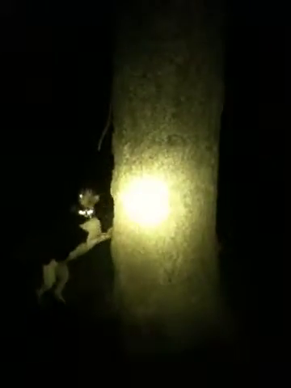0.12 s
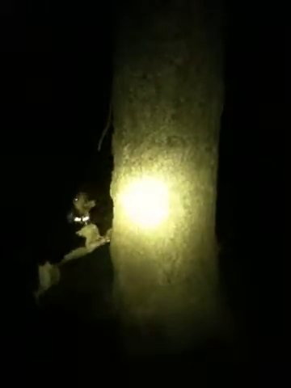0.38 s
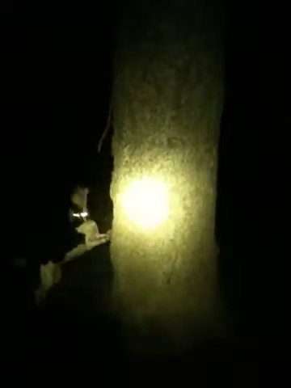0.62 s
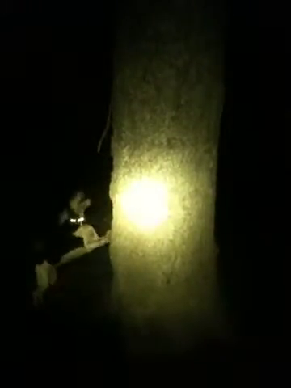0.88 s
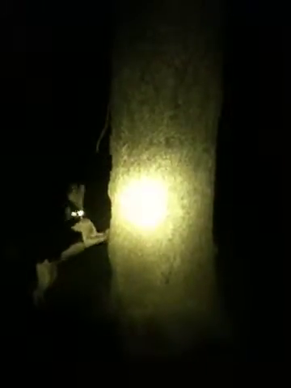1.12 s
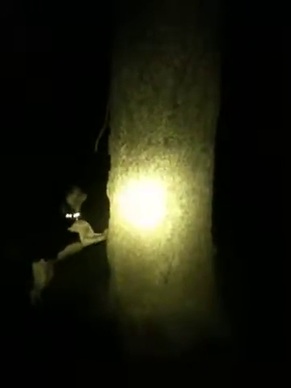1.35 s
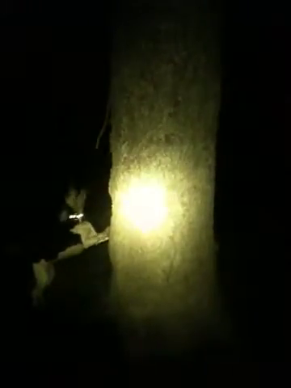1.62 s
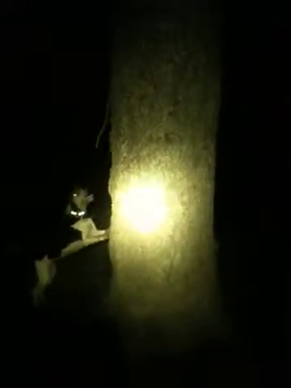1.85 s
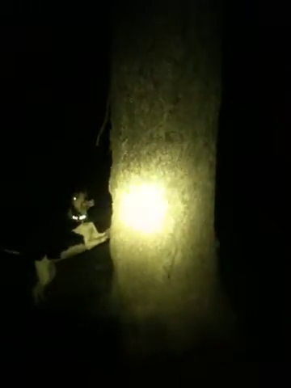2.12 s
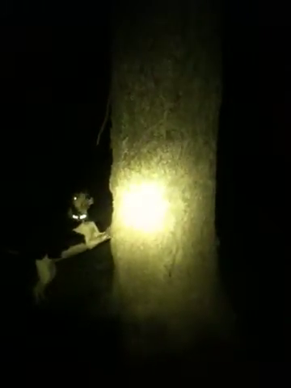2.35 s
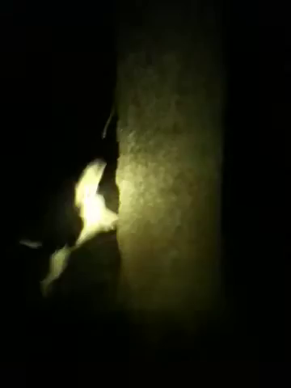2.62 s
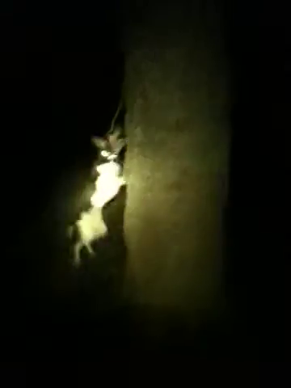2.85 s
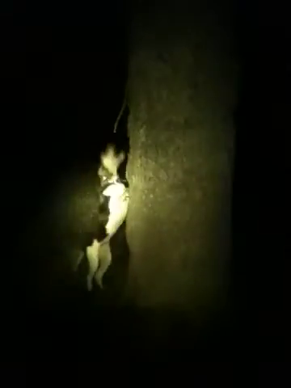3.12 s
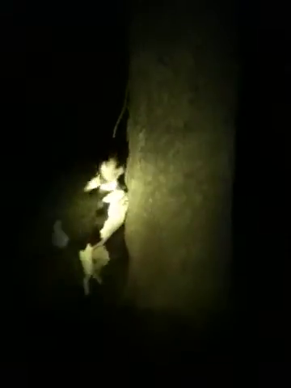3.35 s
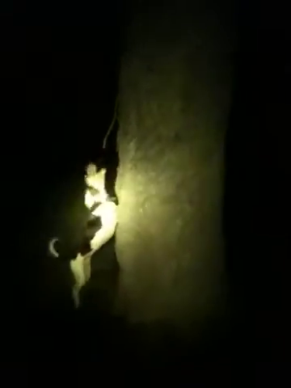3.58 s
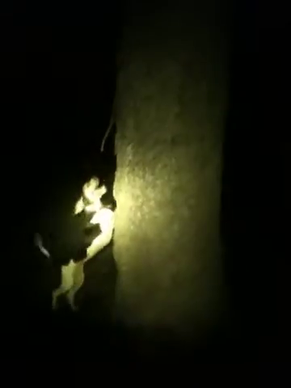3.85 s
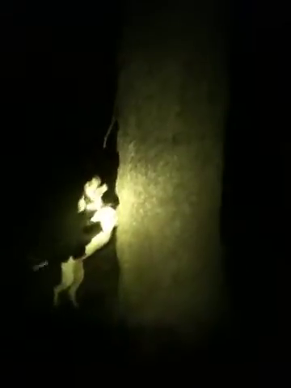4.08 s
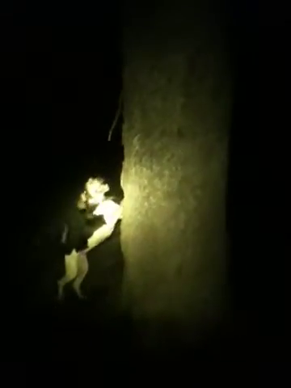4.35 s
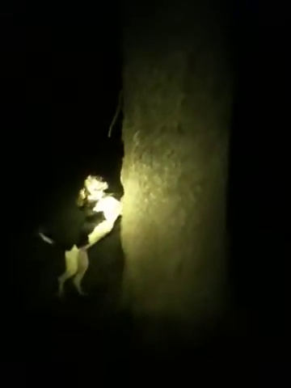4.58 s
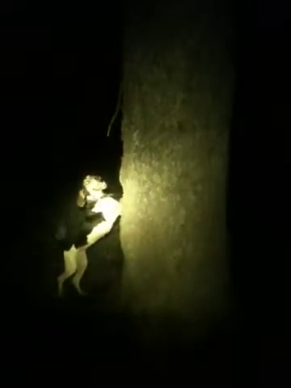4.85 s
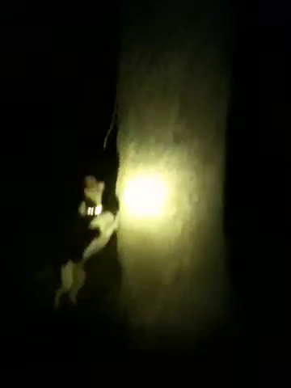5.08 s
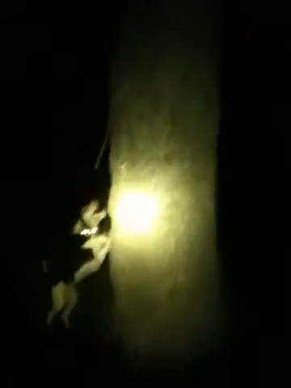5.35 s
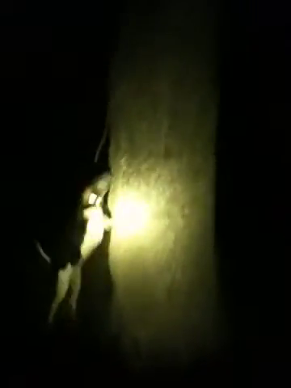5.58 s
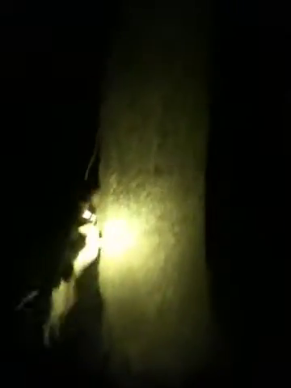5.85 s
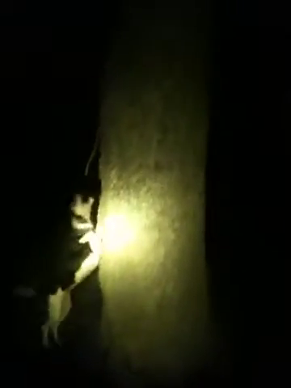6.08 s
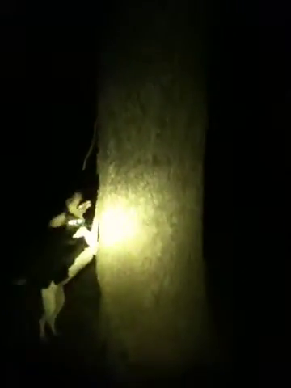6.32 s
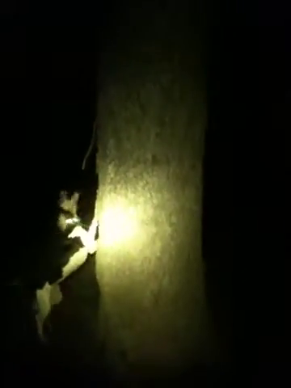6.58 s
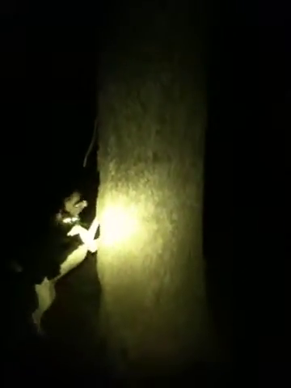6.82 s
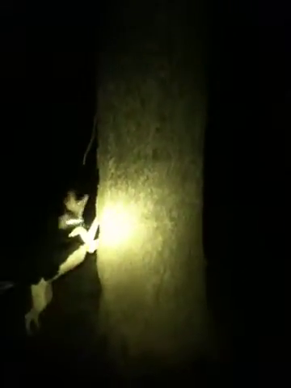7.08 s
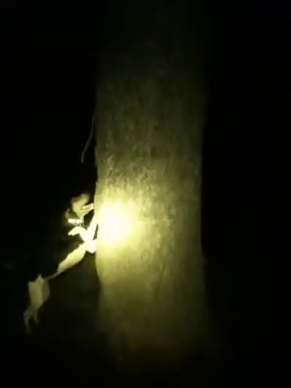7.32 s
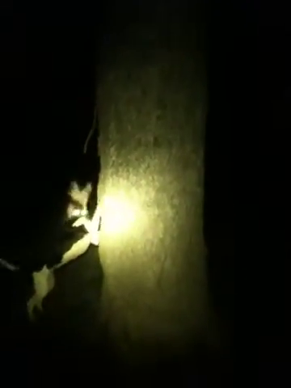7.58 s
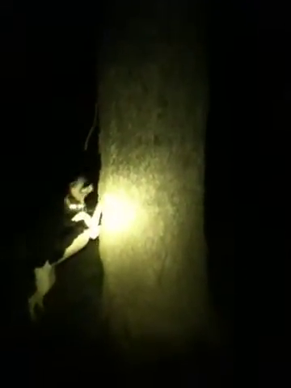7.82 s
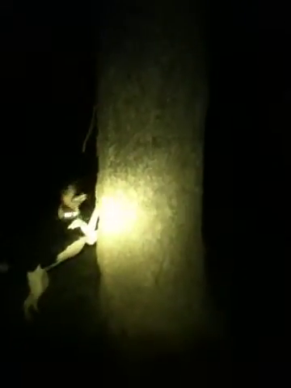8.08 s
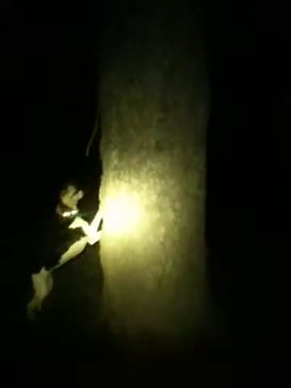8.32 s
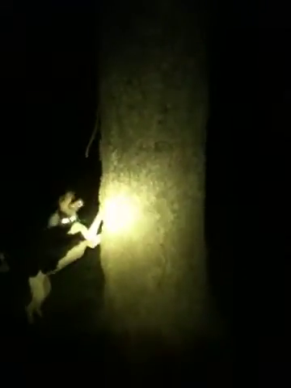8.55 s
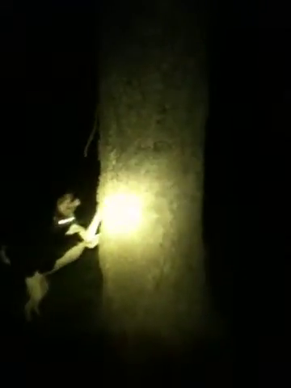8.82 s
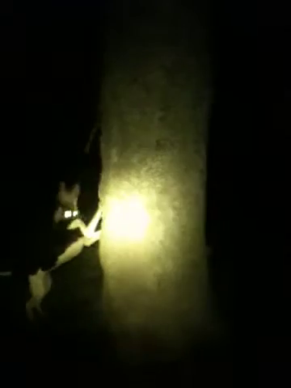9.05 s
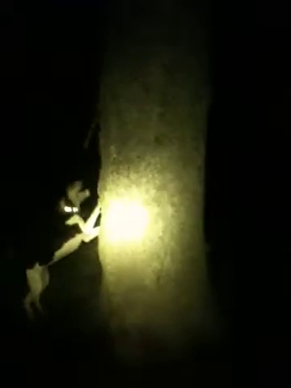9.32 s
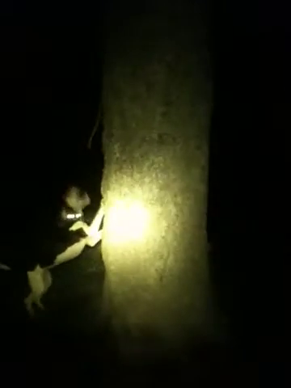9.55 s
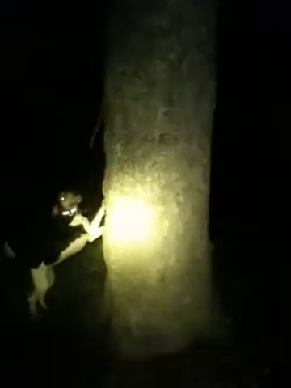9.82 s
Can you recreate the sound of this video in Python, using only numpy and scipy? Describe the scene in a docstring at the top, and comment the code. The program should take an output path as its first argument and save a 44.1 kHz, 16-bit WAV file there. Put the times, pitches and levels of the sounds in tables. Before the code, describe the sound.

One hound barks loudly a few metres from a phone microphone in night woods. Each short bark starts as a clear high yelp, breaks into a rough, raspy tone and sags in pitch. Barks come about every half second in rounds of four, three, seven and two, with pauses between. A dull tail echoes off the trunks. Faint crickets, slight leaf rustles and a few claw ticks sit beneath, and the loudest peaks distort.

```python
"""A hound stands up against a tree in the night woods and barks in quick rounds, a few metres from a phone.
Each bark opens as a clean high yelp, then the vocal folds slip into a doubled period with a rasp; the pitch sags.
Its voice is sine lines on multiples of the fold rate, with noise for the air through the mouth.
The trunks around throw a long dull tail of scattered returns; claws tick on the tree and leaves rustle as noise.
Crickets ring from wing strokes over faint night air and hiss; the phone microphone overloads on the peaks."""
import sys
import numpy as np
from scipy import signal
from scipy.fft import rfft, irfft, next_fast_len
from scipy.io import wavfile
from scipy.ndimage import uniform_filter1d

SR = 44100
rng = np.random.default_rng(int(sys.argv[2]) if len(sys.argv) > 2 else 0)


def wav_out(sig):
    """Save sig, one row per channel (or a flat mono array), as 16-bit PCM at SR to the path in sys.argv[1]."""
    wavfile.write(sys.argv[1], SR, np.round(np.clip(np.atleast_2d(sig).T, -1, 1) * 32767).astype(np.int16))


def undo_db(level):
    """Turn decibels back into plain size, where 20 dB means ten times bigger."""
    steps = np.asarray(level, float) / 20
    return 10 ** steps


N = 437913  # samples


def colour_db(hz, points):
    """Read a spectrum of (f/Hz, level/dB) points on a log-frequency axis."""
    f, db = np.transpose(points)
    return np.interp(np.log(np.maximum(hz, 1)), np.log(f), db)


def coloured(x, points):
    """Filter by a spectrum of points."""
    size = next_fast_len(len(x))
    hz = np.arange(size // 2 + 1) * SR / size
    return irfft(rfft(x, size) * undo_db(colour_db(hz, points)), size)[:len(x)]


def unit(x):
    """Scale to rms 1."""
    return x / np.sqrt(np.mean(x ** 2))


def walk(rate):
    """Smooth random wander, about rate changes a second, spread 1."""
    k = max(int(SR / rate), 1)
    return unit(uniform_filter1d(uniform_filter1d(rng.standard_normal(N), k), k))


def band(x, hz, width):
    """Band-pass around a centre."""
    edges = np.clip([hz - width / 2, hz + width / 2], 20, .45 * SR)
    return signal.sosfilt(signal.butter(2, edges, "band", fs=SR, output="sos"), x)


# the hound's barks, one curve each: [t/s, fold rate f/Hz, fundamental level/dB]
BARK_CURVES = [
    [(0.0, 694, -11), (.008, 717.8, -7.5), (.036, 682.1, -4.5), (.04, 803.3, -4), (.072, 881.5, -8.5),
     (.122, 859.6, -12), (.14, 768.2, -10), (.154, 611.1, -24.5)],
    [(.525, 594.9, -27.5), (.537, 675, -12), (.567, 671.8, -4.5), (.574, 803.4, -7), (.6, 823.7, -6.5),
     (.631, 861, -15), (.661, 854.5, -13.5), (.683, 736.5, -14.5), (.699, 572.9, -29.5)],
    [(1.078, 428.8, -37), (1.09, 574.6, -26), (1.104, 701, -13.5), (1.124, 695.1, -7), (1.132, 650.8, -13),
     (1.138, 819, -7), (1.18, 858.6, -12), (1.222, 881, -18.5), (1.242, 784.5, -16.5), (1.258, 638.2, -26)],
    [(1.638, 453.5, -36), (1.648, 622.1, -26), (1.66, 723.5, -15.5), (1.698, 655.4, -8), (1.702, 794.9, -6),
     (1.752, 882.1, -14), (1.78, 860.8, -15), (1.798, 744.3, -18), (1.826, 444.6, -43.5)],
    [(2.566, 729.9, -26.5), (2.57, 751, -15), (2.589, 800, -3.5), (2.596, 917.5, -5.5), (2.624, 848, -6.5),
     (2.632, 831.2, -5), (2.684, 945, -25.5), (2.7, 967.6, -12), (2.718, 928.9, -20.5),
     (2.73, 694.5, -11.5)],
    [(3.068, 706.3, -20), (3.074, 719.6, -17), (3.092, 793.4, -10), (3.098, 964.2, -16.5),
     (3.106, 1023, -12.5), (3.126, 966, -15.5), (3.134, 913.2, -7), (3.164, 938.5, -9),
     (3.208, 909.6, -7.5), (3.214, 848, -16.5), (3.222, 624.2, -13)],
    [(3.57, 519, -32), (3.58, 655.6, -22.5), (3.587, 715.6, -7.5), (3.619, 727, -0.5), (3.625, 828, -21.5),
     (3.688, 891.2, -12.5), (3.718, 904.8, -12.5), (3.736, 791, -18.5), (3.75, 657.6, -18)],
    [(5.046, 743.3, -16.5), (5.054, 767.2, -5.5), (5.062, 889.7, -15.5), (5.075, 893.5, -8.5),
     (5.115, 848, -9), (5.141, 859.3, -19.5), (5.19, 960.1, -15), (5.204, 868, -16), (5.215, 599.8, -12)],
    [(5.51, 558.5, -34), (5.522, 696.3, -9.5), (5.565, 701.3, -4), (5.573, 858, -8), (5.613, 918.2, -26.5),
     (5.632, 911, -23), (5.64, 992.3, -10), (5.672, 889.6, -18.5), (5.678, 771.3, -28), (5.684, 640, -20.5),
     (5.695, 456.6, -28)],
    [(6.03, 586.7, -29.5), (6.036, 652.7, -17), (6.047, 751.4, -8), (6.058, 897, -15), (6.08, 983, -11),
     (6.1, 869.7, -11), (6.126, 856, -14), (6.172, 881.8, -20), (6.192, 718, -18.5), (6.208, 598.4, -29)],
    [(6.55, 486.1, -39), (6.568, 613.6, -36), (6.576, 680, -15.5), (6.592, 867, -18), (6.61, 859, -12.5),
     (6.626, 846.8, -16.5), (6.654, 847, -24.5), (6.698, 882.5, -18.5), (6.726, 749, -16),
     (6.744, 608.9, -22.5)],
    [(7.09, 516.4, -37.5), (7.102, 680.3, -19), (7.12, 842, -12), (7.134, 809.6, -3.5), (7.149, 778, -7),
     (7.156, 833, -7), (7.196, 897.2, -19.5), (7.225, 878, -41.5), (7.245, 801, -18.5), (7.268, 659.9, -24)],
    [(7.63, 735.7, -21.5), (7.636, 755, -5.5), (7.652, 779.5, -5.5), (7.657, 882, -9.5),
     (7.704, 856, -11.5), (7.745, 899.2, -35.5), (7.77, 868, -15.5), (7.792, 627.3, -20)],
    [(8.163, 655.6, -37), (8.178, 749.6, -29.5), (8.184, 610, -30), (8.193, 681, -12), (8.211, 857.2, -12),
     (8.222, 766.7, 0.5), (8.243, 683, -7), (8.251, 861.5, -10.5), (8.315, 887.4, -29), (8.341, 831, -18.5),
     (8.363, 637.8, -19)],
    [(9.092, 550.5, -34.5), (9.106, 631, -18), (9.116, 791.3, -6.5), (9.136, 822, -5), (9.145, 698, -3.5),
     (9.156, 844.7, -11.5), (9.188, 852.5, -22), (9.24, 904.5, -20.5), (9.268, 644, -20)],
    [(9.61, 710.4, -28.5), (9.621, 747.3, -6), (9.636, 743.5, -2.5), (9.645, 894, -9.5), (9.655, 890, -7),
     (9.676, 844, -5.5), (9.738, 889.4, -20.5), (9.762, 740.4, -12.5), (9.788, 444, -47)],
]
# doubled period in each bark: [from t/s, until t/s, half-rate lines level/dB, rasp at first level/dB,
# rasp at last level/dB], before the throat shapes them
DOUBLED_SPANS = [(0.045, 0.144, -18, -21, -53), (0.57, 0.682, -16.5, -27, -42.5),
                 (1.136, 1.247, -18, -27, -37), (1.701, 1.797, -19, -23, -45.5),
                 (2.628, 2.675, -19.5, -33.5, -25.5), (3.124, 3.168, -21, -21, -44.5),
                 (3.621, 3.745, -20.5, -19, -41.5), (5.099, 5.189, -20, -20, -27),
                 (5.568, 5.631, -23, -31.5, -25), (6.119, 6.194, -25, -27, -48.5),
                 (6.636, 6.726, -21, -17, -42.5), (7.153, 7.255, -20, -27, -45.5),
                 (7.704, 7.785, -22.5, -28.5, -46), (8.247, 8.355, -19.5, -24, -42),
                 (9.149, 9.259, -20, -18, -35), (9.678, 9.758, -19, -27, -36)]
# octave and closing croak of each bark: [octave early in the yelp level/dB, late in the yelp level/dB,
# once doubled level/dB, croak level/dB]
OCTAVE_AND_CROAK = [(-18.5, -22.5, -28.5, -51), (-28.5, -17.5, -25, -53), (-22.5, -16.5, -26.5, -46),
                    (-24.5, -13.5, -26, -54), (-25.5, -31, -35, -25), (-21, -33, -30, -23.5),
                    (-23.5, -28, -25, -37.5), (-22, -18.5, -31, -23.5), (-16, -21.5, -44.5, -44),
                    (-19, -47, -34, -28.5), (-20.5, -24, -24.5, -35), (-25.5, -32.5, -31.5, -46),
                    (-25, -34, -27.5, -48), (-21, -21.5, -27.5, -34.5), (-22, -21, -27.5, -37.5),
                    (-25, -26.5, -30, -37.5)]
SILENT_DB = -60
SWELL_DB_S, DIE_DB_S = 3999.5, 1399.5  # edges of a bark, dB/s
SWELL_FROM, DIE_TO = .7, .6  # pitch at silence as a share of the nearest point
BREAK_IN_DB_S, TIRE_DB_S, LET_GO_DB_S = 3501.5, 55, 801.5  # half-rate lines: sudden start, slow fading, end
CLEAN_DB = -47  # floor of half-rate lines and rasp in the clean yelp
RASP_LEAD_DB_S, CROAK_LEAD_DB_S = 1499, 1202.5  # the rasp announces the break; the croak grows and dies
CROAK_LATE_S, CROAK_HALF_DB = 0.0091, -11  # croak peak after the last point; half-rate lines against croak
CLOSING_HZ, CLOSING_DB_HZ = 824, 0.13  # under this fold rate the closing mouth mutes the octave
CATCH_DB, CATCH_S = 5.5, 0.0016  # the fundamental catches for a moment at the break


def bark_controls(t):
    """Fold rate and line levels; each bark swells on a rising pitch and dies on a falling one."""
    rows, others = [], np.full((3, len(t)), 1. * SILENT_DB)
    for bark in BARK_CURVES:
        (start, hz_in, db_in), (end, hz_out, db_out) = bark[0], bark[-1]
        rows.append((start - (db_in - SILENT_DB) / SWELL_DB_S, SWELL_FROM * hz_in, SILENT_DB))
        rows += bark
        rows.append((end + (db_out - SILENT_DB) / DIE_DB_S, DIE_TO * hz_out, SILENT_DB))
    s, hz, db = np.transpose(rows)
    hz, main = np.interp(t, s, hz), np.interp(t, s, db)
    closing = np.maximum(CLOSING_HZ - hz, 0)
    for bark, span, voicing in zip(BARK_CURVES, DOUBLED_SPANS, OCTAVE_AND_CROAK):
        on, off, half, rasp_on, rasp_off = span
        early, late, held, croak = voicing
        start, end = bark[0][0], bark[-1][0]
        since, before, after = np.maximum(t - on, 0), np.maximum(on - t, 0), np.maximum(t - off, 0)
        edges = -SWELL_DB_S * np.maximum(start - t, 0) - DIE_DB_S * np.maximum(t - end, 0)
        # in the yelp the octave stays under the fundamental
        yelp = np.minimum(np.interp(t, [start, on], [early, late]), main - 2.5)
        octave = np.where(t < on, yelp, held - CLOSING_DB_HZ * closing)
        half = half - BREAK_IN_DB_S * before - TIRE_DB_S * since - LET_GO_DB_S * after
        main = main - CATCH_DB * np.exp(-((t - on) / CATCH_S) ** 2)
        rasp = np.interp(t, [on, off], [rasp_on, rasp_off])
        rasp = rasp - RASP_LEAD_DB_S * before - LET_GO_DB_S * after
        croak = croak - CROAK_LEAD_DB_S * np.abs(t - end - CROAK_LATE_S)
        half, rasp = np.maximum(half, croak + CROAK_HALF_DB), np.maximum(rasp, croak)
        floor = CLEAN_DB + edges
        others = np.maximum(others, [octave + edges, np.maximum(half, floor), np.maximum(rasp, floor)])
    return hz, main, *others


# each bark's air and mouth: [hiss at the start level/dB, hiss at the break level/dB,
# upper overtones level/dB, half-rate lines above the fundamental level/dB], all relative
MOUTH_SHAPES = [(-1, 0.5, 2, -1), (-2.5, 1, 5.5, 0), (1, -1.5, -8, -0.5), (-0.5, -1.5, 7.5, -0.5),
                (-5.5, 1, 11, -0.5), (-0.5, -1, 2, 7.5), (-2.5, 2.5, -2, 3.5), (-7, -0.5, 14, 0.5),
                (-1.5, 0, 3.5, 1.5), (-6.5, -4, 0.5, -1.5), (-3.5, 0, -4.5, 0), (-4.5, -1, -2, -2),
                (-6.5, -1, 0, 1), (-2, 0, 7, -2.5), (4, -1, 2.5, -1.5), (-4.5, 0, 4, -4)]
# rough burst as the mouth shuts: after the last point, half length, level before the mouth resonances
BURST_LATE_S, BURST_S, BURST_DB = 0.025, 0.0089, -48.5


def mouth(t):
    """Gains of hiss, closing burst, upper overtones and upper half-rate lines, bark by bark."""
    hiss, burst = [], 0
    for bark, (on, *_), (at_start, at_break, *_) in zip(BARK_CURVES, DOUBLED_SPANS, MOUTH_SHAPES):
        start, end = bark[0][0], bark[-1][0]
        hiss += [(start, at_start), (on, at_break), (end + .1, at_break)]
        burst = burst + undo_db(BURST_DB) * np.exp(-((t - end - BURST_LATE_S) / BURST_S) ** 2)
    which = np.searchsorted([bark[-1][0] + .15 for bark in BARK_CURVES[:-1]], t)
    upper, above = undo_db(np.array(MOUTH_SHAPES)[which, 2:].T)
    return undo_db(np.interp(t, *np.transpose(hiss))), burst, upper, above


# how throat and mouth pass the overtones, doubled lines and rasp: [f/Hz, level/dB]
THROAT_TONE = [(200, -20), (430, -5), (640, 5), (900, 5), (1080, 0), (1300, 0), (1800, -10), (2300, -34),
               (3300, -40), (5000, -34.5), (9000, -37)]


def throat_db(hz):
    """Resonances of throat and mouth weight each line by its frequency."""
    return colour_db(hz, THROAT_TONE)


def yelp_lines(hz, cycle, main, octave, doubled, upper):
    """Regular fold motion: fundamental, octave and weak, broken upper overtones."""
    octave = octave * undo_db(2.5 * walk(60))
    lines = -main * np.cos(cycle) + octave * np.cos(2 * cycle)
    # upper overtones sound only while the pitch holds still
    steady = uniform_filter1d(np.exp(-np.abs(np.gradient(hz)) * SR / 4000), size=300)
    overtones = 0
    for k in range(3, 8):
        drift = (k - 2) * (.35 + .4 * doubled) * walk(150)
        broken = undo_db(5 * walk(70)) * np.sin(k * cycle + drift)
        overtones = overtones + undo_db(throat_db(k * hz) - 0.98 * (k - 3)) * broken
    return lines + octave * steady * upper * overtones


SHUT_DB_HZ = 0.0607  # as the pitch sags the closing mouth tilts the half-rate lines down, per multiple


def doubled_lines(hz, cycle, half, hiss, above):
    """Every second fold cycle differs: lines on half multiples, with ragged streaks in the treble."""
    shut = SHUT_DB_HZ * np.clip(CLOSING_HZ - hz, 0, 400)
    lines, streaks = 0, 0
    for k in np.arange(.5, 5):
        gain = undo_db(throat_db(k * hz) - shut * (k - 1.5)) * (above if k > 1 else 1)
        lines = lines + gain * np.cos(k * cycle)
    for k in np.arange(3, 9, .5):
        ragged = undo_db(7 * walk(35)) * np.sin(k * cycle + .17 * k * walk(70))
        streaks = streaks + undo_db(throat_db(k * hz)) * ragged
    return half * (undo_db(-9.0) * hiss * streaks - lines)


def rasp_lines(hz, cycle, rasp):
    """The quarter-rate pattern comes and goes from cycle to cycle, so its lines are smeared."""
    lines = 0
    for k in np.arange(.75, 3, .5):
        smeared = (.7 + .6 * walk(70)) * np.cos(k * cycle + .95 * walk(70))
        lines = lines + undo_db(throat_db(k * hz)) * smeared / k
    return rasp * lines


# resonances that colour the air rushing through the mouth: [f/Hz, width f/Hz, relative level/dB]
AIR_RESONANCES = [(680, 747, -3.5), (1404, 800, 1), (3450, 990, -10), (4560, 1100, -15.5),
                  (6230, 1300, -14.5), (8630, 3000, -20), (13100, 3600, -29.5)]


def mouth_air(cycle, main, half, rasp, crack, hiss, burst):
    """Air noise follows the effort, rises with the rough parts and puffs as the folds open wide."""
    effort = undo_db(-30.5) * main + undo_db(-28.0) * half + undo_db(-20.5) * rasp + undo_db(6) * crack ** 2
    effort = hiss * uniform_filter1d(effort, size=300)
    puffs = (.45 + 1.1 * np.exp(3 * (np.cos(cycle / 2) - 1))) * undo_db(4 * walk(110))
    puffs = rng.standard_normal(N) * puffs
    air = 0
    for hz, width, db in AIR_RESONANCES:
        flare = undo_db(4 * walk(30))  # each resonance flares and fades on its own
        drive = effort + burst * (3000 < hz < 6000)
        resonance = unit(band(band(puffs, hz, width), hz, 1.5 * width))
        air = air + undo_db(db) * flare * drive * resonance
    return air


# a thin whistle of air just before some barks: [t/s, half length t/s, f/Hz, level/dB]
AIR_WHISTLES = [(5.038, .0035, 4407, -36), (7.618, 0.0047, 4104, -35.5), (9.603, 0.0042, 3930, -41)]


def whistles(t):
    """Brief unsteady sines swell and fade before the folds catch."""
    total = 0
    for s, half_s, hz, db in AIR_WHISTLES:
        swell = undo_db(db) * np.exp(-((t - s) / half_s) ** 2)
        total = total + swell * np.sin(2 * np.pi * hz * t + 1.4 * walk(200))
    return total


def hound():
    """Lines on whole, half and quarter multiples of the fold rate, plus mouth air."""
    t = np.arange(N) / SR
    hz, *levels = bark_controls(t)
    main, octave, half, rasp = (np.maximum(undo_db(db) - undo_db(SILENT_DB), 0) for db in levels)
    hiss, burst, upper, above = mouth(t)
    # the folds tremble more once the period has doubled
    doubled = np.clip(half / (main + 1e-9), 0, 1)
    rough = np.clip(rasp / (main + half + 1e-9), 0, 1)
    trembling = hz * (1 + (.003 + .004 * doubled + .012 * rough) * walk(150))
    cycle = 2 * np.pi * np.cumsum(trembling) / SR
    shimmer = undo_db((.3 + .8 * doubled + 2.5 * rough) * walk(120))
    # the voice cracks where half-rate lines break in: a short dip and a burst of air
    crack = np.maximum(half - np.roll(half, 250), 0)
    shimmer *= np.exp(-6 * crack)
    voice = yelp_lines(hz, cycle, main, octave, doubled, upper)
    voice += doubled_lines(hz, cycle, half, hiss, above)
    voice += rasp_lines(hz, cycle, rasp)
    air = mouth_air(cycle, main, half, rasp, crack, hiss, burst)
    return np.sqrt(2) * shimmer * voice + air + whistles(t)


# tone of the dull tail, its high treble swallowed by the woods: [f/Hz, level/dB]
WOODS_TONE = [(150, -4), (450, -9), (700, -13), (950, -7.5), (1200, -10.5), (1800, -9.5), (2400, 2.5),
              (5000, -33), (12000, -37)]


def woods(x):
    """Scattered returns: trunk and ground answer bright and short, near trees dull, the far forest rings on."""
    t = np.arange(3 * SR) / SR
    # each tail builds up, then falls 60 dB in 0.54 s or 3.31 s
    near = undo_db(-45.5 - 60 * t / 0.54) * (1 - np.exp(-t / 0.0013))
    far = undo_db(-66 - 60 * t / 3.31) * (1 - np.exp(-t / 0.014))
    chance = rng.standard_normal((2, len(t)))
    # a fast random wavering of level blurs the voice lines in the tail
    wavering = x * undo_db(2.5 * walk(40))
    dull = coloured(signal.fftconvolve(wavering, chance[0] * (near + far))[:N], WOODS_TONE)
    trunk = np.exp(-t / .028) * (t > .006)
    bright = undo_db(-30.5) * signal.fftconvolve(band(x, 6200, 7600), chance[1] * trunk)[:N]
    return dull + bright


# claws ticking on the tree: [t/s, level/dB at the onset, before noise and colour]
CLAW_TICKS = [(6.9118, -50), (9.495, -43), (9.8841, -43.5)]
# leaves under the paws: [t/s, half length t/s, level/dB before noise and colour]
LEAF_RUSTLES = [(0.439, 0.014, -55.5), (1.898, .004, -54.5), (2.224, 0.028, -62.5), (5.866, 0.011, -64),
                (6.974, 0.0097, -55), (8.634, 0.022, -59), (8.781, 0.034, -57.5)]


def claws():
    """Each tick is a burst of bright noise a few milliseconds long; leaves rustle as soft hiss."""
    t = np.arange(N) / SR
    ticks = np.zeros(N)
    for s, db in CLAW_TICKS:
        ticks[int(s * SR)] = undo_db(db)
    ticks = signal.fftconvolve(ticks, np.exp(-t[:600] / 0.0072))[:N]
    rustle = sum(undo_db(db) * np.exp(-((t - s) / half_s) ** 2) for s, half_s, db in LEAF_RUSTLES)
    noise = (ticks + rustle) * rng.standard_normal(N)
    return coloured(noise, [(800, -16), (3500, 1.0), (9000, -3.0), (15000, -15.0)])


# cricket trills, some overlapping, each on its own note: [start t/s, length t/s, f/Hz, level/dB]
CRICKET_TRILLS = [(.32, 0.22, 3190, -67), (.6, 0.82, 3410, -66.5), (1.85, 0.96, 3373, -69.5),
                  (4.58, 1.23, 3390, -73), (5.6, 0.58, 3440, -67), (7.75, 1.4, 3380, -72),
                  (9.7, .4, 3455, -63.5)]
TRILL_FADE_S = 0.14


def crickets():
    """Wing strokes about 75 a second ring one note a trill, 3.2 to 3.5 kHz, over a faint far chorus."""
    t = np.arange(N) / SR
    stroke_count = np.floor(np.cumsum(75 * (1 + .3 * walk(60))) / SR)
    strokes = np.diff(stroke_count, prepend=0)
    strokes = strokes * undo_db(4 * walk(30)) + .06 * rng.standard_normal(N)
    chorus = undo_db(-76 + 2 * walk(2)) * unit(band(strokes, 3370, 330))
    trills = 0
    for s, length, hz, db in CRICKET_TRILLS:
        fade = np.clip(np.minimum(t - s, s + length - t) / TRILL_FADE_S, 0, 1)
        trills = trills + undo_db(db) * fade * unit(band(band(strokes, hz, 125), hz, 350))
    return chorus + undo_db(3 * walk(9)) * trills


# tone of night air and microphone hiss: [f/Hz, relative level/dB per Hz]
NIGHT_TONE = [(60, -20), (170, 4.5), (400, -16.5), (900, -2.5), (2200, -22.5), (5000, -20), (15000, -27.5)]


def night_air():
    """Steady coloured noise: the open night and the microphone's own hiss, at -64 dB rms."""
    return undo_db(-64) * unit(coloured(rng.standard_normal(N), NIGHT_TONE))


def scene():
    """Dog, its returns from the woods, claws, crickets and night air."""
    dog = hound()
    return (dog + woods(dog) + claws() + crickets() + night_air())[None]


def roll_off(x):
    """The treble ends steeply here."""
    return signal.sosfilt(signal.butter(12, 15860, fs=SR, output="sos"), x)


# the phone microphone is weak in the bass: [f/Hz, level/dB]
MICROPHONE_BASS = [(120, -6), (330, 0)]
CLIP_LEVEL = .7  # of full scale


def record(dry):
    """The converter cuts off the loudest cycles flat, a touch earlier on one side; then the bass is thinned."""
    clipped = np.clip(dry[0], -CLIP_LEVEL, 0.95 * CLIP_LEVEL)
    mix = coloured(clipped, MICROPHONE_BASS)[None]
    return roll_off(mix)


dry = scene()
out = record(dry)
wav_out(out)
```